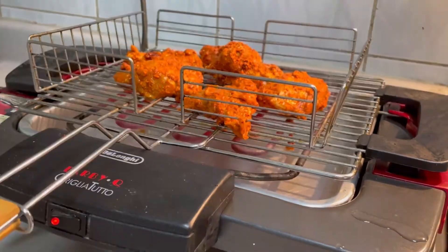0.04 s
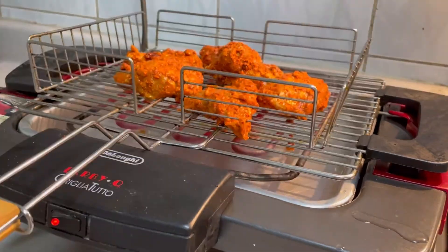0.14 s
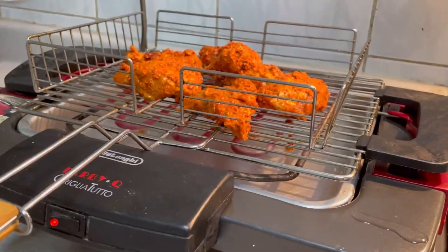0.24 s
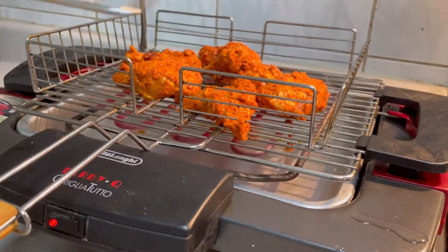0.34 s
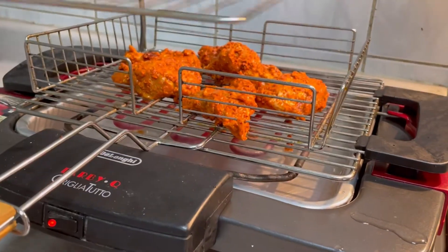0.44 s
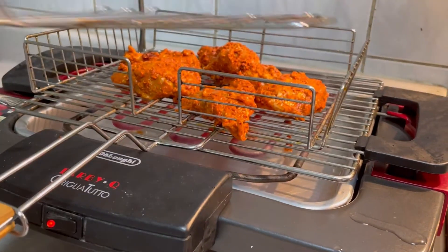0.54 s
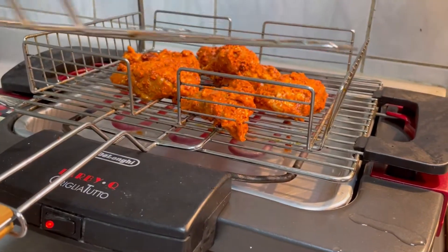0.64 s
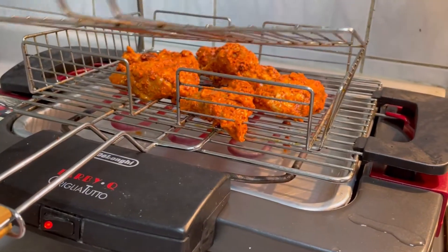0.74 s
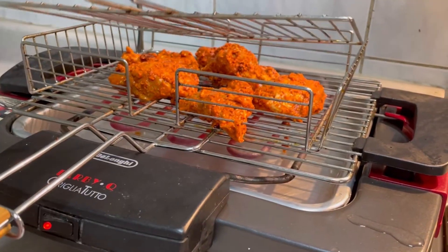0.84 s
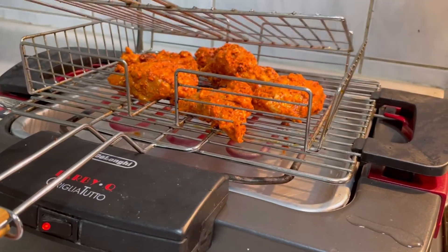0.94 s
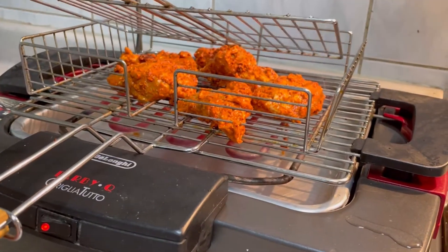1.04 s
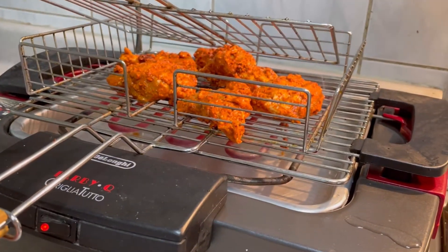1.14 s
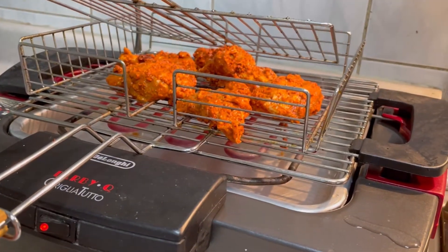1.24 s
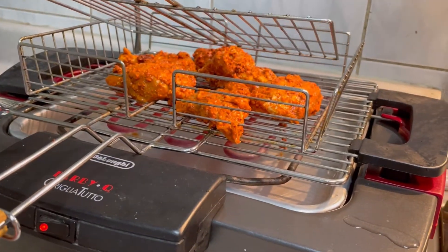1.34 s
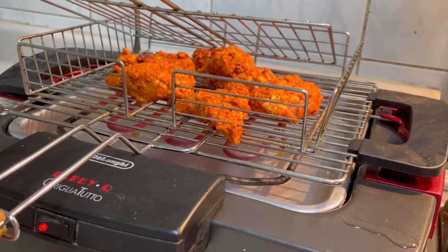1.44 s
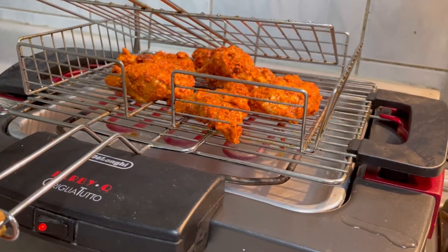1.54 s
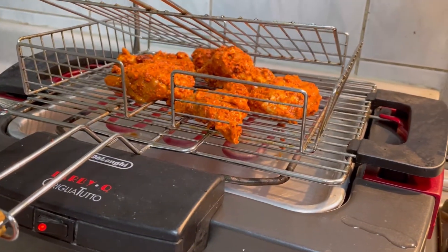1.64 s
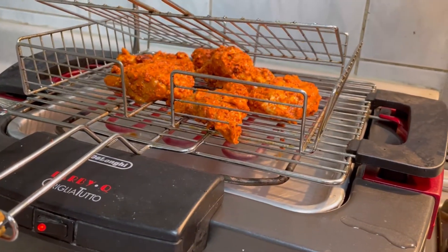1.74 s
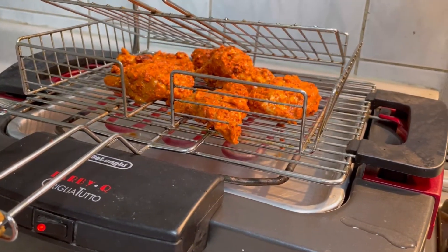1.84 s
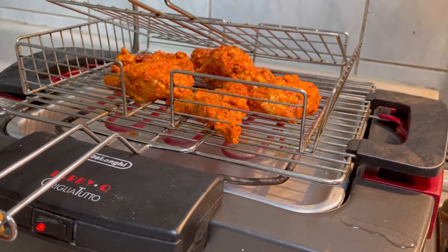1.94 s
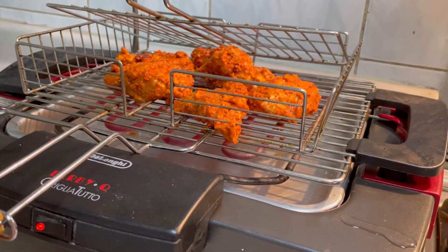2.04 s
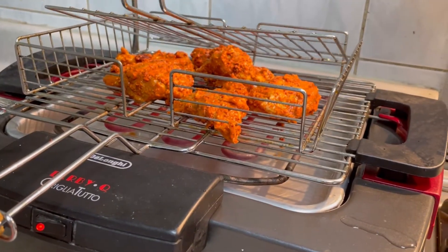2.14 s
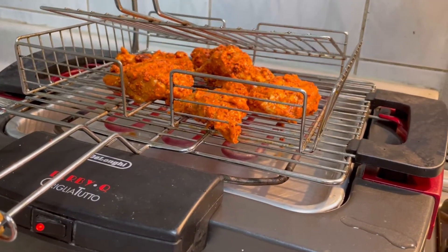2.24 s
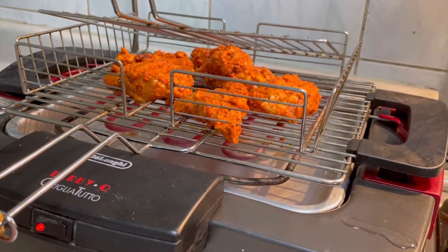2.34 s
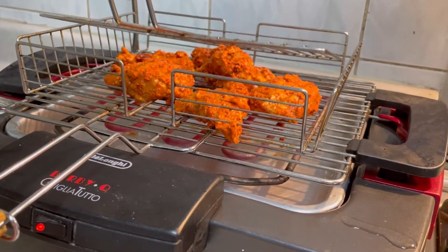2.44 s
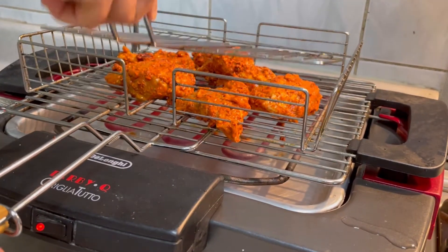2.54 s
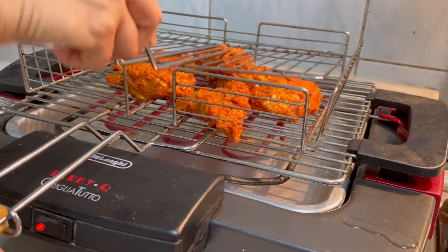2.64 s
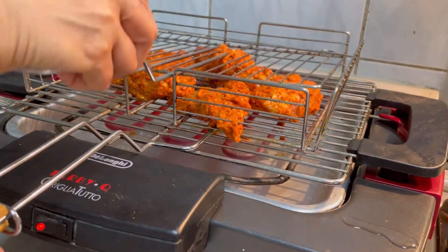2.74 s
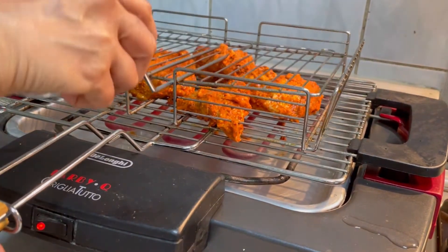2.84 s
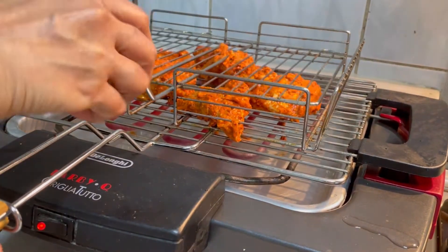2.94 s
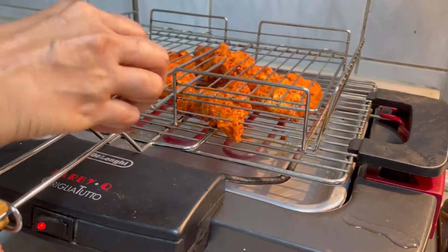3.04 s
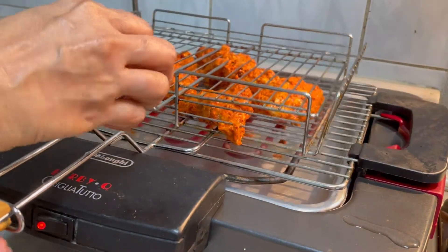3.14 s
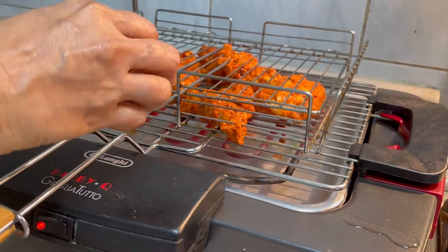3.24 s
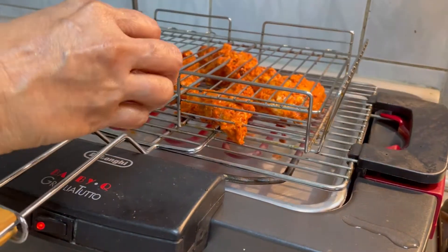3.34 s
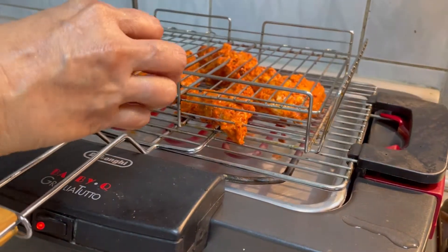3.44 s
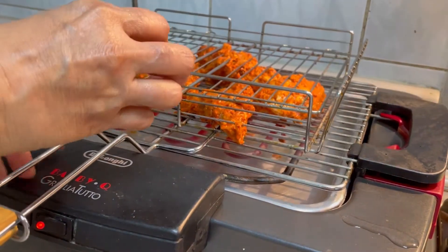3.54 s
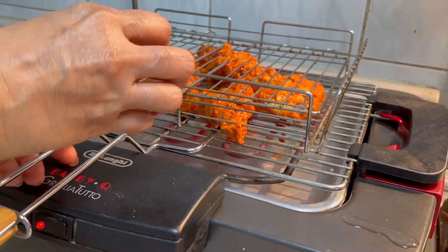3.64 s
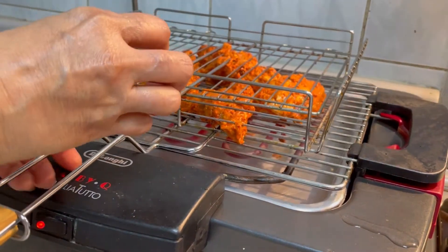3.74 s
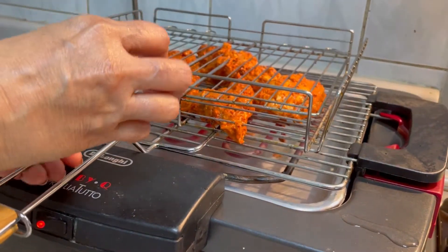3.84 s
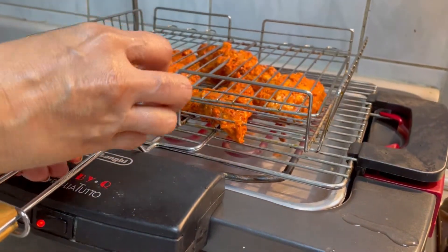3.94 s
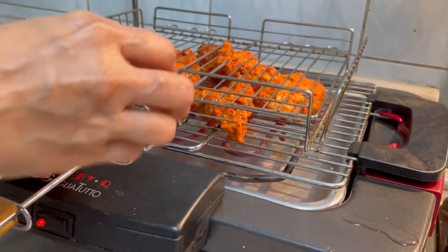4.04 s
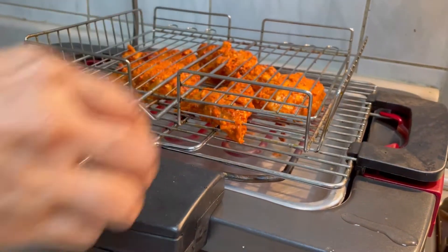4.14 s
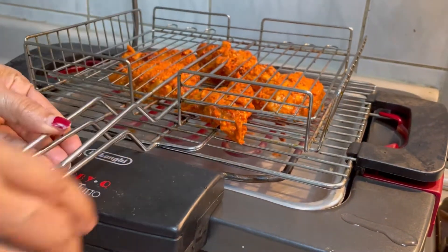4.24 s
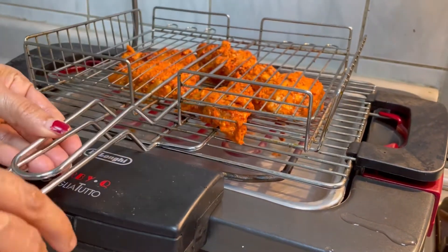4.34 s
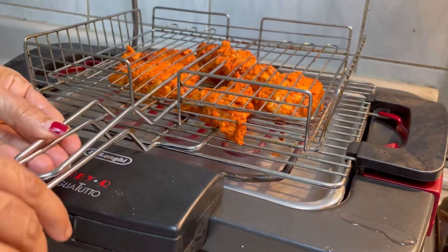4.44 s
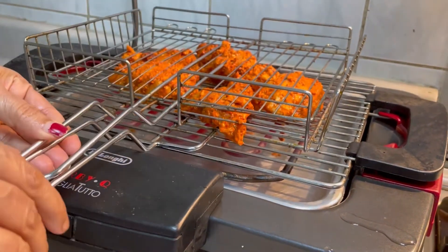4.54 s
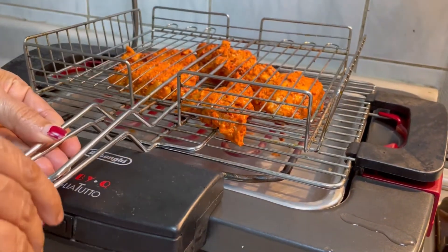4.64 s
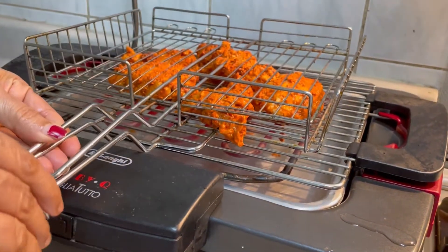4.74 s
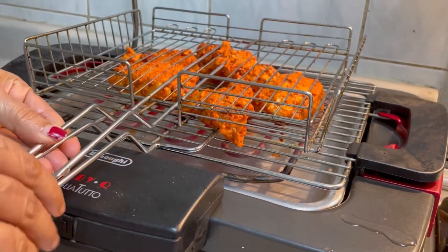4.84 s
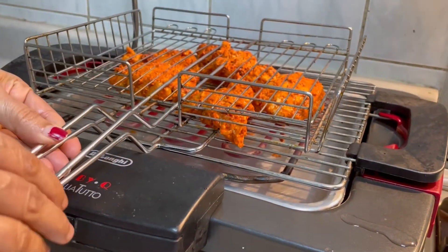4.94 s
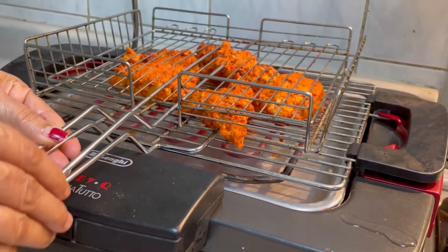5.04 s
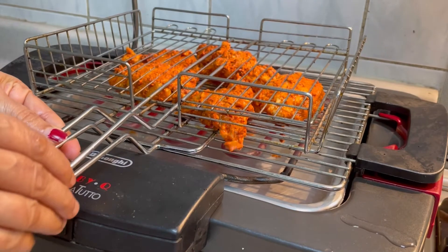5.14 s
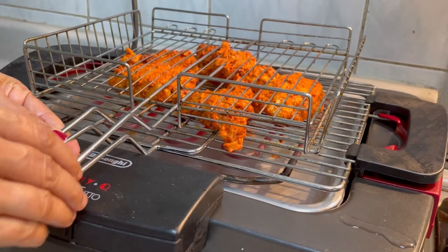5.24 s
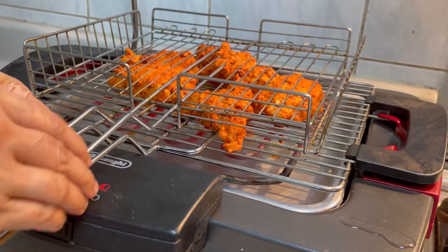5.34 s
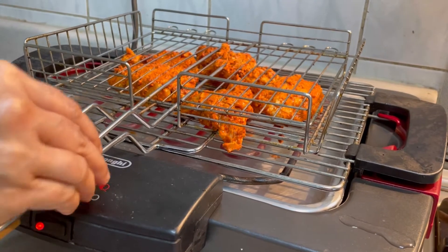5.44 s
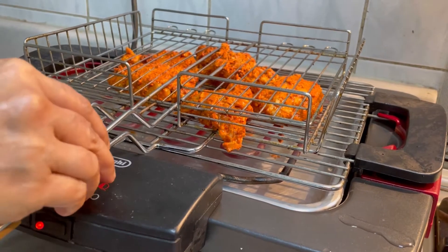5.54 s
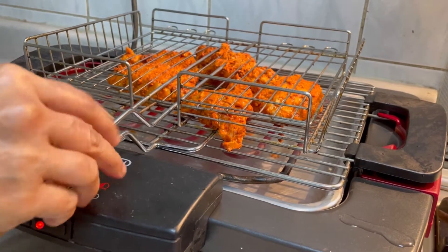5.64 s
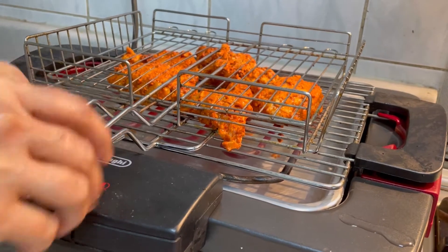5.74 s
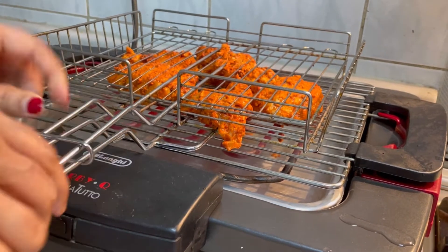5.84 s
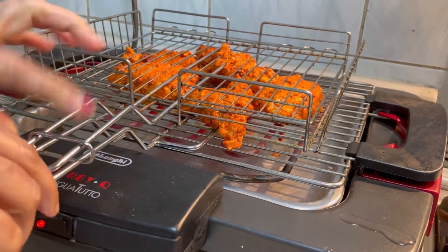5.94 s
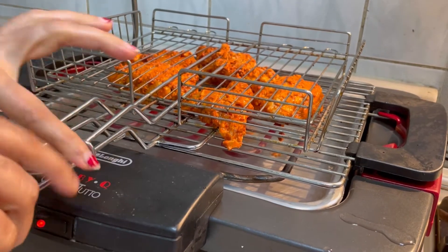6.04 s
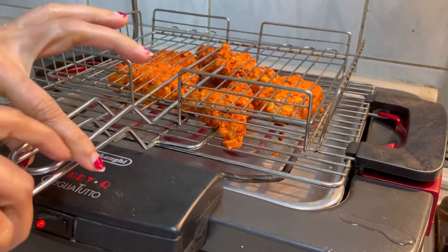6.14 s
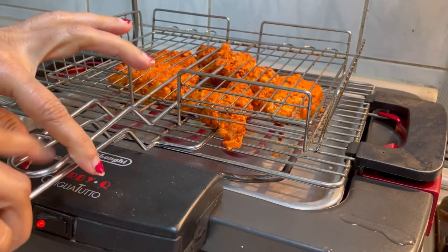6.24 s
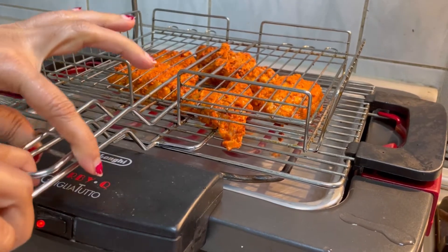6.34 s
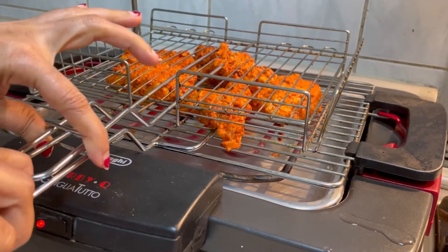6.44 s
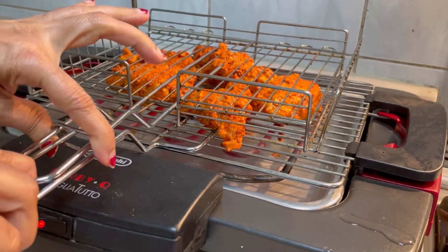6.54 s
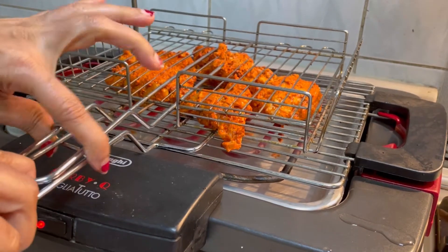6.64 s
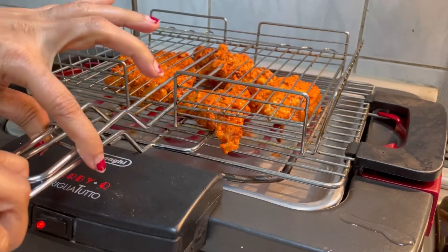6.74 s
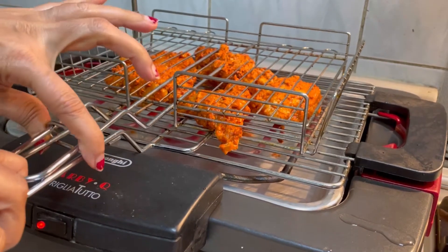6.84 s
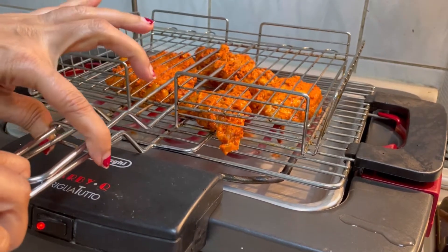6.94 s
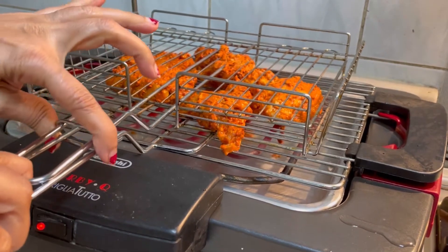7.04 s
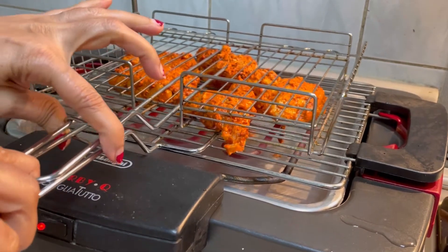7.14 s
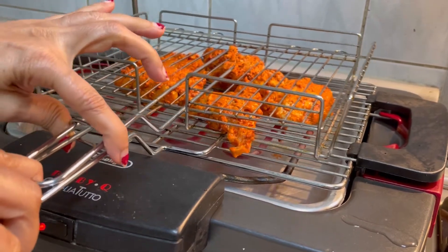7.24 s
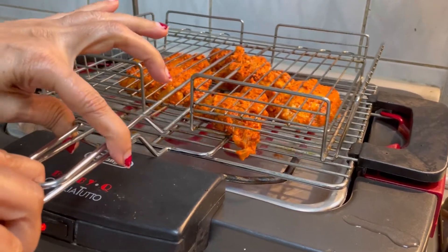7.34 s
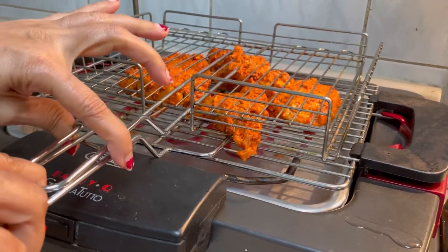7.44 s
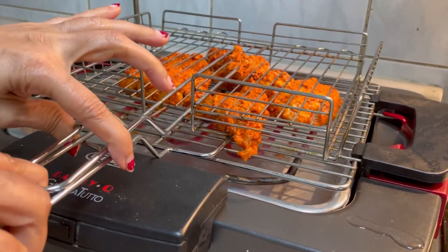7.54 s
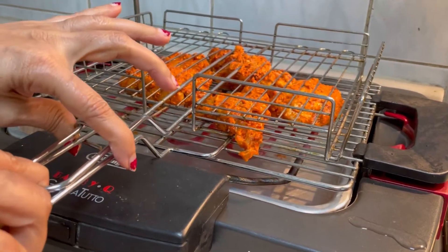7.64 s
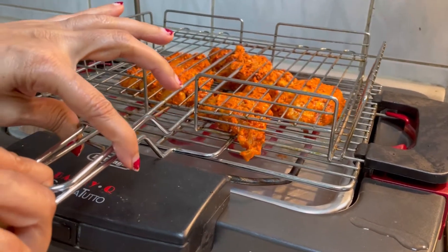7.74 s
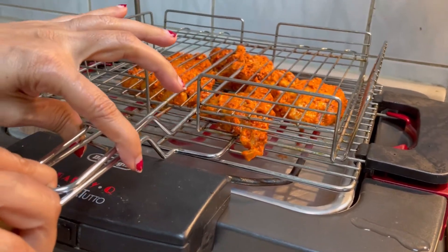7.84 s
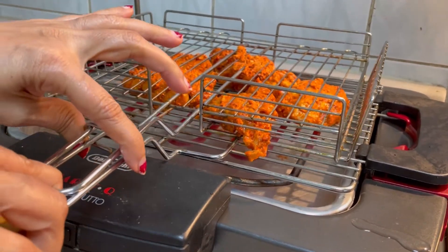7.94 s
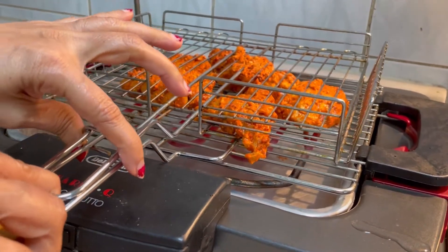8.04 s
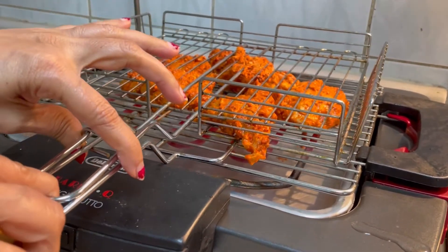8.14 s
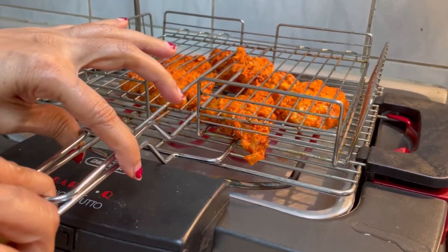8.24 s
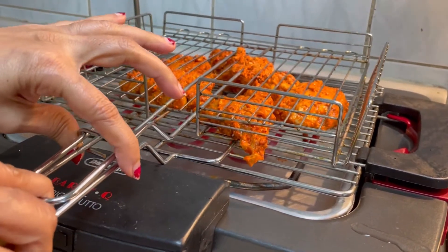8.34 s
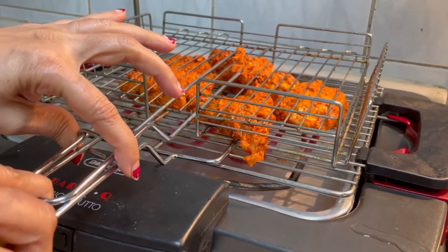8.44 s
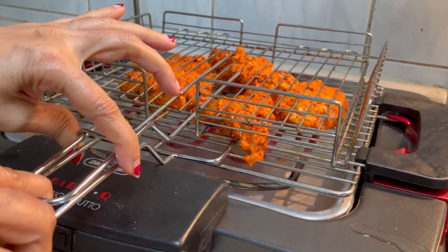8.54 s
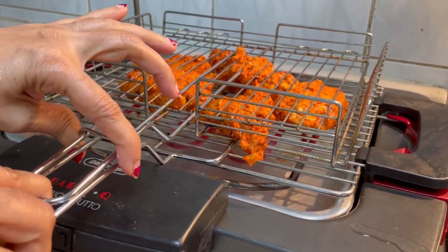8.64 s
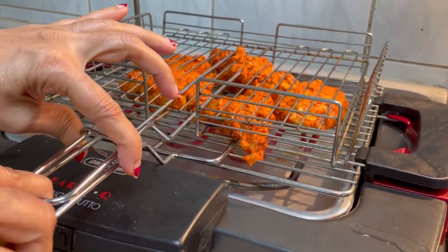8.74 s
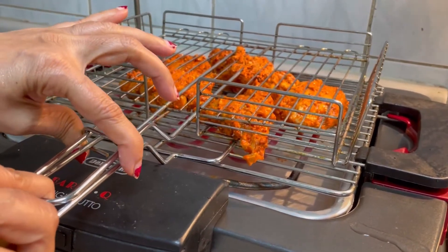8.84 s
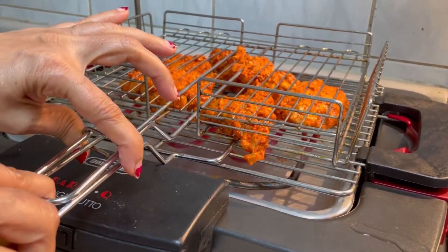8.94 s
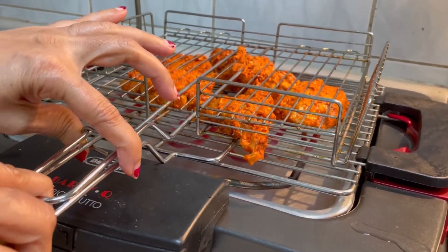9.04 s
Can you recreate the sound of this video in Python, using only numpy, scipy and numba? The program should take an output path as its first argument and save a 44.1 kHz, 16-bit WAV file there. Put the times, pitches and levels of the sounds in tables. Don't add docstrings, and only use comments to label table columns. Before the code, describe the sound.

In a small tiled kitchen, close up, food sizzles faintly on a humming electric grill. Thin wire clinks, a tiny silent gap follows, then the basket lid knocks and rattles down with dull body thuds. Around the middle the handles snap with a sharp, loud metallic clack and short tiled ring. Quiet clicks and taps follow over swelling sizzle. Stereo phone, struck sounds slightly left.

```python
import sys
import numpy as np
from scipy import signal
from scipy.fft import rfft, irfft, next_fast_len
from scipy.io import wavfile
from scipy.ndimage import uniform_filter1d
from numba import njit

SR = 44100
rng = np.random.default_rng(int(sys.argv[2]) if len(sys.argv) > 2 else 0)


def materialize(psi):
    bounded = np.clip(np.atleast_2d(psi).T, -1, 1)
    quanta = np.round(bounded * 32767).astype(np.int16)
    wavfile.write(sys.argv[1], SR, quanta)


def invert_db(level):
    return 10 ** (np.asarray(level, dtype=float) / 20)


N = 400862
SIZE = next_fast_len(N + SR)
HZ = np.maximum(np.arange(SIZE // 2 + 1) * SR / SIZE, 1)

# low_hz, high_hz
BED_BANDS_HZ = [(40, 400), (500, 3000), (3000, 7000), (10500, 15800)]
# freq_hz, density_db
FIRST_COLOUR = [(30, -17), (55, -4.5), (85, 6), (150, -11.5), (300, -13), (950, -25), (1700, -23),
                (1850, -19.5), (2900, -17), (3300, -21), (5600, -22.5), (8000, -15.5), (12300, -12),
                (13300, -8), (14200, -14), (16000, -16)]
# freq_hz, density_db
SECOND_COLOUR = [(30, -13), (55, -3.5), (85, 4), (140, -5.5), (280, -8), (600, -17), (1000, -21.5),
                 (1700, -23.5), (1900, -19), (2800, -22), (5600, -25), (8500, -16.5), (11500, -16.5),
                 (15000, -16.5)]
# start and end rows of hum_db, air_db, hiss_db, sizzle_db
REST_DB = [
    [(-70, -62.5, -67, -63.5), (-64.5, -62.5, -68.5, -64)],
    [(-58.5, -62, -67, -63), (-58, -64.5, -67, -64.5)],
]
# peak_s, gain_db, rise_s, fall_s, hiss_share
FLARES = [(.86, 1.5, 0.2, 0.38, 0.7), (1.45, 4, 0.038, 0.052, 1), (3.25, 6, 0.18, 0.93, 1.38),
          (4.53, 8.5, 0.28, 0.32, 1), (5.56, 6, 0.32, 0.92, 0.9), (4.97, 5.5, 0.17, 0.27, 0.9),
          (6.71, 7.5, 0.12, 0.22, 0.37), (7.25, 8.5, 0.25, 0.24, 0.5), (7.45, 12, 0.1, 0.39, 0.79),
          (8.1, 7.5, 0.61, 0.34, 0.84)]
# start_s, hum_db, air_db, treble_db
WASHES = [
    (.66, -59.5, -76, -54),
    (2.18, -56, -65, -76),
    (3.06, -52.5, -57, -64),
    (4.554, -50, -39.5, -46),
]
# start_s, end_s, level_db
MUTES = [
    (.0135, .0175, -8),
    (2.1005, 2.1205, -80),
]
# start_s, peak_db, spot_hz, bright_re_peak_db
KNOCKS = [(0.6613, -39.5, 1250, -17), (0.666, -38, 1140, -20), (0.676, -44.5, 1100, -21),
          (2.172, -42, 830, -25), (2.179, -33, 835, -23), (2.179, -35.5, 1870, -19),
          (2.192, -37.5, 690, -25), (2.36, -37, 786, -18), (2.358, -42.5, 1250, -23),
          (2.385, -43, 1880, -22), (2.391, -43, 940, -25), (2.665, -46, 845, -16), (3.037, -40, 1900, -20),
          (3.041, -39.5, 890, -23), (3.069, -43, 750, -18), (3.0793, -37, 1150, -21),
          (3.09, -35.5, 2000, -16), (3.098, -36.5, 1050, -15), (3.105, -42, 1590, -11),
          (3.112, -43, 1100, -18), (3.12, -43, 900, -17), (3.136, -45, 1700, -15), (3.141, -39.5, 874, -23),
          (3.569, -43, 725, -11), (3.595, -43.5, 1090, -2),
          (4.194, -47, 1880, -12), (4.359, -40.5, 1940, -1.5), (4.541, -51, 3900, -7),
           (4.546, -39, 2520, 1), (4.5518, -17.5, 3250, -13), (4.553, -23, 3880, -11),
           (4.742, -51, 1110, -20), (5.191, -51.5, 504, -16), (5.262, -42.5, 3640, -11),
           (5.355, -34, 855, -22), (5.356, -39.5, 610, -25), (5.37, -48, 1000, -25),
           (5.356, -44.5, 2620, -16), (5.4035, -42, 3460, -14), (5.418, -46, 1900, -20),
           (5.42, -39, 900, -22), (5.432, -39.5, 700, -11), (5.447, -45, 736, -20), (5.6465, -40, 940, -22),
           (5.647, -42, 2100, -18), (5.654, -50, 430, -25), (5.755, -50, 1130, -25),
           (5.839, -46.5, 875, -17), (6.454, -45, 890, -10), (6.464, -46.5, 454, -25),
           (6.671, -45.5, 850, -25), (6.684, -51, 1060, -25), (6.453, -43, 1990, -12),
           (7.08, -40, 910, -27), (7.08, -39, 1720, -22), (7.087, -46, 477, -25)]
# start_s, peak_db, spot_hz, bright_re_peak_db, length_s
SCRAPES = [
    (.001, -33, 444, 0.5, 0.0058),
    (1.932, -43.5, 740, -27, 0.039),
    (1.96, -53, 715, -29, 0.11),
    (2.6, -49, 880, -26, 0.11),
    (3.074, -36, 1080, -12, 0.058),
    (4.5515, -20, 2090, -5, 0.0073),
    (4.558, -24, 1050, -23, 0.021),
    (2.362, -43, 950, -25, .05),
    (6.69, -52, 980, -25, 0.03),
    (7.428, -43.5, 1050, -12, 0.031),
]
# freq_hz, t60_s, level_db
BASKET = [(894, .11, 5), (960, .09, 5), (1113, .1, 5), (2075, .11, 9), (2145, .07, 4), (2300, .06, 2),
          (3400, .06, 9), (3884, .06, 9), (5408, .12, 4), (6420, .05, 4), (8430, .1, 4), (11783, .1, 8),
          (13138, .07, 6), (14480, .08, 6)]
# start_s, peak_db, body_re_peak_db
TICKS = [(0.0413, -50, -3), (0.074, -40.5, -3), (0.3261, -41.5, -1), (0.466, -45, -5), (0.845, -51, 2.5),
         (1.849, -51, 2), (0.74, -43, -2), (0.932, -42, -14), (0.968, -39, -3), (1.0281, -42, -18.5),
         (1.065, -46, -7), (1.1837, -41, -9), (1.427, -42, -10), (2.055, -45.5, -13), (2.355, -39.5, -6),
         (3.221, -47, -12), (3.765, -45, 2), (4.0524, -47, 0), (4.1265, -43, -1), (4.1971, -40.5, -0.5),
         (4.4408, -41, -15), (4.944, -41, -6), (5.155, -42.5, -12), (5.24, -44, -17), (5.7108, -41.5, -5),
         (5.7867, -44, -7), (6.038, -48, -7), (6.4722, -42, -7), (7.861, -43, -6), (8.17, -39, -19),
         (8.292, -43, -7), (8.4766, -45, -17)]
# start_s, peak_db, body_re_peak_db, t60_s, burst_s
SPRAYS = [(.655, -29.5, -11.5, .03, 0.00068), (0.6556, -31, -20, 0.08, 0.008),
          (2.657, -34.5, -11.5, 0.061, 0.0051), (4.5496, -10.5, -6.5, 0.055, 0.0082),
          (2.177, -45, 9, 0.019, 0.0061), (3.075, -52, 7, 0.023, 0.036), (3.1, -46, 4.5, .02, .03)]
# start_s, peak_db, pitch_hz
THUDS = [(0.662, -42, 103.6), (1.457, -49.5, 87), (1.983, -46, 126), (2.173, -36, 119), (2.388, -38, 125),
         (2.659, -41, 136), (3.048, -38, 130), (3.128, -35.5, 131), (3.24, -42, 90), (4.553, -29.5, 193),
         (5.369, -53, 87), (5.426, -50, 190), (5.549, -53, 88.8), (6.459, -48.5, 88), (6.718, -52, 56.6),
         (7.09, -52, 132)]
# start_s, peak_db, pitch_hz
DEEP_THUDS = [(4.555, -36, 55), (3.2, -56, 72), (3.13, -43, 60), (2.39, -45.5, 59), (1, -52, 170),
              (0.53, -49, 96)]
# start_s, pitch_hz, level_db, length_s
SINGS = [(2.928, 1020, -59, .045), (3.235, 1020, -59, .1), (4.578, 450, -49, .08), (4.69, 430, -56, .12),
         (4.8, 455, -59, .18), (5.652, 900, -51, .04), (4.551, 6400, -36, .014), (5.262, 3540, -50, .008),
         (5.404, 3460, -45, .009), (2.358, 1300, -50, .018), (4.74, 1100, -56, .02), (3.04, 450, -63, .25),
         (2.359, 750, -41, .016), (.659, 3700, -52, .016), (.655, 6100, -47, .008),
         (2.1795, 1900, -50, .006), (2.385, 1900, -47, .006)]
# freq_hz, phase_rad
PORT_PHASE = [(0, 0), (2200, -.2), (2900, .9), (3250, 2.9), (3700, 1.2), (5200, 1.3), (5650, np.pi),
              (5900, 4.7), (6600, 5.8), (7500, 3.6), (8200, np.pi), (8950, np.pi), (13000, 0)]
# freq_hz, correlation
LIKENESS = [(50, .95), (300, .75), (750, .2), (2200, .65), (3300, .75), (4500, .35), (5650, .7), (6400, .6),
            (7100, .35), (7800, .92), (8600, .998), (9600, .85), (12500, .85), (13200, .995)]


def on_log(table, hz):
    f, v = np.transpose(table)
    return np.interp(np.log(hz), np.log(f), v)


def walk(rate_hz):
    k = int(SR / rate_hz)
    held = np.repeat(rng.standard_normal(N // k + 1), k)
    return 1.21 * uniform_filter1d(held, k)[:N]


def ports(common, apart, keep=1):
    f, turn_rad = np.transpose(PORT_PHASE)
    like = np.clip(keep * on_log(LIKENESS, HZ), 0, 1)
    same = np.sqrt((1 + like) / 2) * common
    other = np.sqrt((1 - like) / 2) * apart
    half = np.exp(.5j * np.interp(HZ, f, turn_rad))
    return np.array([(same + other) * half, (same - other) / half])


def hump(s, peak_s, rise_s, fall_s):
    u = np.where(s < peak_s, (peak_s - s) / rise_s, (s - peak_s) / fall_s)
    return np.cos(np.pi / 2 * np.clip(u, 0, 1)) ** 2


def bed_levels(rest_db, start_s, end_s):
    s = np.arange(0, N / SR, .005)
    db = np.array([np.interp(s, [start_s, end_s], pair) for pair in np.transpose(rest_db)])
    for peak_s, gain_db, rise_s, fall_s, hiss_share in FLARES:
        shares = [0, 0.27, hiss_share, 1]
        db = db + np.outer(shares, gain_db * hump(s, peak_s, rise_s, fall_s))
    power = invert_db(2 * db)
    rise_s = 0.0095
    t60_s = np.array([1.4, 0.84, 0.42, 0.71])[:, None]
    for at_s, hum_db, air_db, treble_db in WASHES:
        age_s = np.maximum(s - at_s, 0)
        top_db = np.array([hum_db, air_db, treble_db, treble_db])[:, None]
        power = power + np.clip(age_s / rise_s, 0, 1) * invert_db(2 * (top_db - 60 * age_s / t60_s))
    return np.transpose([s, *(10 * np.log10(power))])


def frying_spits():
    rate_hz, level_db = 310, -7.5
    hits = (rng.random(SIZE) < rate_hz / SR) * rng.standard_normal(SIZE)
    hits = hits * invert_db(2.2 * np.minimum(rng.exponential(size=SIZE), 4))
    crack = rng.standard_normal(size=60) * np.exp(-np.arange(60) / 15)
    spits = np.convolve(hits, crack)[:SIZE]
    return rfft(spits / spits.std()) * invert_db(level_db) * np.clip(HZ / 2500, 0, 1) ** 2


def background(curves, colour):
    flicker_db, swell_db = .8, .7
    noise = rng.standard_normal((2, SIZE))
    both = ports(rfft(noise[0]) + frying_spits(), rfft(noise[1])) * invert_db(on_log(colour, HZ))
    power = np.abs(both.mean(axis=0)) ** 2 * 2 / SIZE ** 2
    s, *levels = np.transpose(curves)
    trims = []
    for db, (lo, hi) in zip(levels, BED_BANDS_HZ):
        trims.append(db - 10 * np.log10(power[(HZ > lo) & (HZ < hi)].sum()))
    trims = np.transpose(trims)
    centres = np.log([np.sqrt(lo * hi) for lo, hi in BED_BANDS_HZ])
    swell, out = walk(14), 0
    for step in np.arange(0, 9.6, .5):
        hz = 25 * 2 ** step
        share = np.clip(1 - 2 * np.abs(np.log2(HZ / hz)), 0, 1)
        trim_db = [np.interp(np.log(hz), centres, row) for row in trims]
        db = np.interp(np.arange(N) / SR, s, trim_db)
        db += flicker_db * walk(16) + swell_db * swell * (hz > 1000)
        out = out + invert_db(db) * irfft(both * share, SIZE)[:, :N]
    return out


@njit
def add(out, lag, push, hz, t60, gain):
    for m in range(len(hz)):
        p = np.exp((2j * np.pi * hz[m] - np.log(1000) / t60[m]) / SR)
        z = 0j
        for i in range(min(len(push) + int(t60[m] * SR), len(out) - lag[m])):
            z = z * p + (push[i] if i < len(push) else 0.)
            out[lag[m] + i] += (gain[m] * z).imag


def strike(out_len, hz, t60_s, gain, rattle_s, peak_band_hz, lag_cycles=2.2):
    u = np.linspace(.05, 1, int(rattle_s * SR) + 2)
    bumps = rng.standard_normal((4608, 2))[:len(u)]
    push = bumps[:, 0] * (np.abs(bumps[:, 1]) > 1.3) * np.sin(np.pi * u ** .5)
    push[0] += .3
    colour = np.abs(rfft(push, 8192)[(hz / SR * 8192).astype(int)]) ** 2
    gain = gain / np.sqrt(colour + .15 * colour.mean())
    spot = rng.random((2, len(hz)))
    lag = (lag_cycles * SR / hz * spot[0]).astype(np.int64)
    out = np.zeros(out_len)
    add(out, lag, push, hz, t60_s, gain * np.exp(2j * np.pi * spot[1]))
    band = signal.sosfilt(signal.butter(2, peak_band_hz, "band", fs=SR, output="sos"), out)
    return out / np.max(np.abs(band))


def place(events):
    line = np.zeros(N + 2 * SR)
    for s, sound in events:
        line[int(s * SR):int(s * SR) + len(sound)] += sound
    return line[:N]


def knocks():
    knock_rattle_s, knock_t60_s, scrape_t60_s = 0.0041, 0.074, 0.088
    above_db_oct, below_db_oct = 10.5, 17
    spot_db, spot_octaves, treble_db, scatter_db = 3.5, 0.14, -3.5, 2.5
    frame_hz, frame_t60_s, frame_level_db = np.transpose(BASKET)
    wires = 300 * 50 ** rng.random(size=400)
    hz = np.r_[frame_hz, wires]
    rows = [(*row, scrape_t60_s) for row in SCRAPES]
    rows += [(*row, knock_rattle_s, knock_t60_s) for row in KNOCKS]
    heard = []
    for s, db, spot_hz, bright_db, rattle_s, t60_s in rows:
        frame_db = frame_level_db + 3 + 2 * min(db + 26, 0)
        octaves = np.log2(hz / spot_hz)
        near_spot = np.where(octaves > 0, -above_db_oct * octaves, below_db_oct * octaves)
        near_spot += spot_db * np.exp(-(octaves / spot_octaves) ** 2)
        bright_curve = [(1500, -44), (4000, bright_db), (6500, bright_db), (12000, bright_db + treble_db)]
        bright = on_log(bright_curve, hz)
        own_db = np.r_[frame_db, 0 * wires] + np.maximum(near_spot, bright + spot_db / 2)
        gain = invert_db(own_db + scatter_db * rng.standard_normal(len(hz)))
        ring_s = 0.84 * np.clip(t60_s, .01, .4) * (1000 / hz) ** .65
        ring_s[:len(BASKET)] = frame_t60_s
        body = strike(SR // 2, hz, ring_s, gain, np.clip(rattle_s, 0, .1), (500, 4000))
        heard.append((s, invert_db(db) * body))
        click_curve = [(500, -43), (1200, -8.5), (2400, -11), (5000, bright_db), (15000, bright_db - 15)]
        click = invert_db(on_log(click_curve, wires))
        edge_t60_s = np.full(len(wires), 0.011)
        edge = strike(SR // 10, wires, edge_t60_s, click, 0.00091, (500, 4000), lag_cycles=2.5)
        heard.append((s, invert_db(db - 5 - 230 * rattle_s) * edge))
    return place(heard)


def ticks():
    tick_t60_s, tick_burst_s = 0.011, 0.0031
    heard = []
    for s, db, body_db, t60_s, burst_s in SPRAYS + [(*row, tick_t60_s, tick_burst_s) for row in TICKS]:
        hz = 1500 + 14300 * rng.random(size=360)
        curve = [(1500, body_db), (2000, body_db + 0.5), (2800, body_db + 7), (3600, body_db + 5.5),
                 (6000, min(body_db, 0) + 0.5), (9000, 0), (16000, 0)]
        gain = invert_db(on_log(curve, hz))
        ring_s = np.full(len(hz), np.clip(t60_s, .004, .2))
        crack = strike(SR // 5, hz, ring_s, gain, np.clip(burst_s, 0, .03), (10000, 15800))
        heard.append((s, invert_db(db) * crack))
    return place(heard)


def thuds():
    thud_t60_s, deep_t60_s = 0.26, 0.32
    frame_hz = np.array([55.6, 75.8, 82.6, 110.7, 123.8, 126.7, 161.0, 207.6, 209.0, 244.0, 303.0])
    rows = [(*row, thud_t60_s) for row in THUDS] + [(*row, deep_t60_s) for row in DEEP_THUDS]
    heard = []
    for s, db, hz, t60_s in rows:
        body_hz = np.r_[hz, frame_hz]
        mode_db = 3.0 * rng.standard_normal(len(body_hz)) - 14 * np.abs(np.log2(body_hz / hz))
        gain = np.where(body_hz == hz, 2, 1) * invert_db(mode_db)
        ring_s = np.clip(t60_s, .03, .5) * (100 / body_hz) ** .5
        thud = strike(SR, body_hz, ring_s, gain, 0.032, (50, 300), lag_cycles=0.97)
        heard.append((s, invert_db(db - 3.5) * thud))
    return place(heard)


def sings():
    heard, wobble = [], invert_db(2.5 * walk(70))
    for s, hz, db, length_s in SINGS:
        u = np.arange(int(length_s * SR)) / (length_s * SR)
        tone = np.sin(np.pi * u ** .5) * np.sin(2 * np.pi * hz * length_s * u)
        heard.append((s, invert_db(db) * tone * wobble[int(s * SR):][:len(u)]))
    return place(heard)


def room(x):
    level_db, t60_s, corner_hz = -5, 0.42, 5860
    t = np.arange(SR) / SR
    tail = rng.standard_normal((2, SR)) * invert_db(-60 * t / t60_s) * np.clip(t / 0.0073, 0, 1)
    tail = rfft(tail / np.sqrt(np.sum(tail[0] ** 2)), SIZE) / np.sqrt(1 + (HZ / corner_hz) ** 2)
    near = rfft(x, SIZE)
    early = rng.standard_normal(size=200) * np.hanning(200) / 14
    beside = near * rfft(early, SIZE) * np.clip(HZ / 400, 0, 1)
    direct = ports(near, beside, keep=0.6)
    diffuse = ports(near * tail[0], near * tail[1])
    return irfft(direct + invert_db(level_db) * diffuse, SIZE)[:, :N]


def scene():
    t = np.arange(N) / SR
    change_s = np.mean(MUTES[1][:2])
    second = bed_levels(REST_DB[1], change_s, t[-1])
    first = bed_levels(REST_DB[0], 0, change_s)
    bed = np.where(t > change_s, background(second, SECOND_COLOUR), background(first, FIRST_COLOUR))
    chop = np.where((t > MUTES[0][0]) & (t < .2), .03, 1)
    left_db = 1.5
    nearer_left = invert_db(np.array([[left_db], [-left_db]]) / 2)
    struck = room(knocks() + thuds() + sings())
    return bed + chop * nearer_left * struck + room(ticks())


def roll_off(x):
    return signal.sosfilt(signal.butter(12, 15900, fs=SR, output="sos"), x)


def record(dry):
    top = signal.ellip(6, .2, 45, 15850, fs=SR, output="sos")
    bass = signal.butter(3, 40, "high", fs=SR, output="sos")
    t, db = np.arange(N) / SR, 0
    for start_s, end_s, level_db in MUTES:
        db = db + level_db * ((t > start_s) & (t < end_s))
    mix = signal.sosfilt(np.r_[top, bass], dry) * uniform_filter1d(invert_db(db), size=90)
    return roll_off(mix)


dry = scene()
out = record(dry)
materialize(out)
```